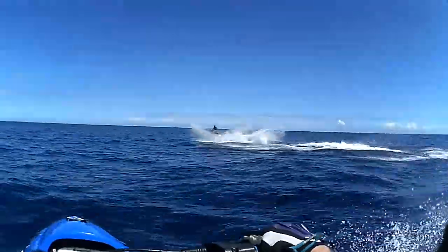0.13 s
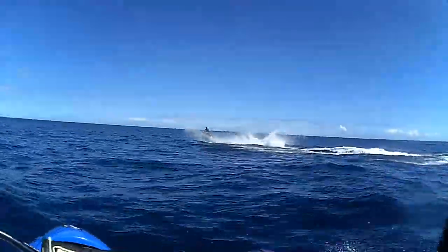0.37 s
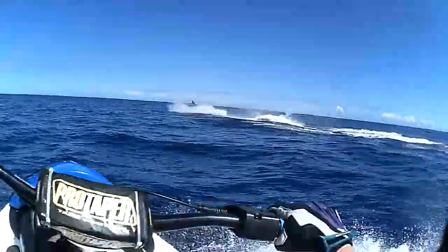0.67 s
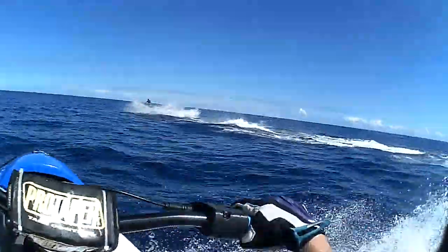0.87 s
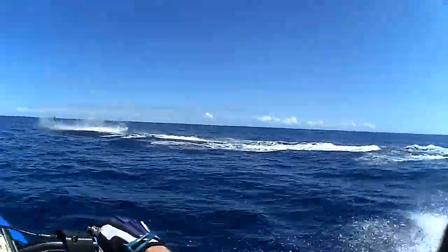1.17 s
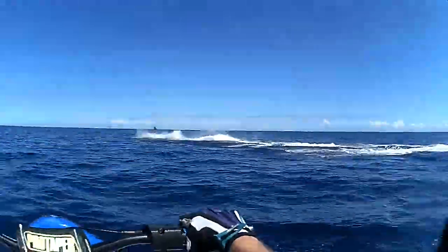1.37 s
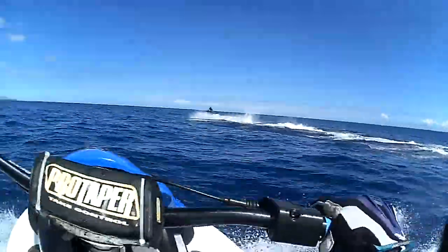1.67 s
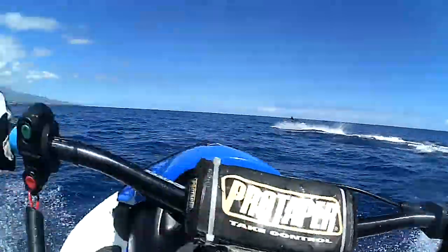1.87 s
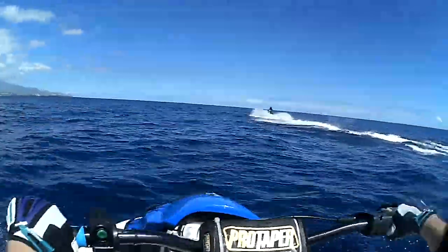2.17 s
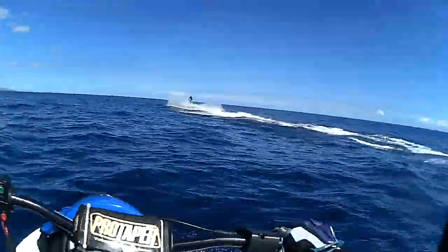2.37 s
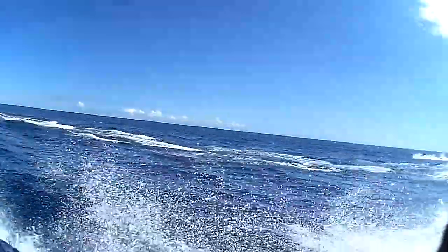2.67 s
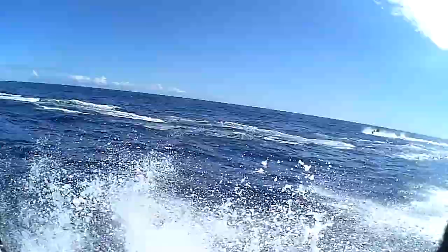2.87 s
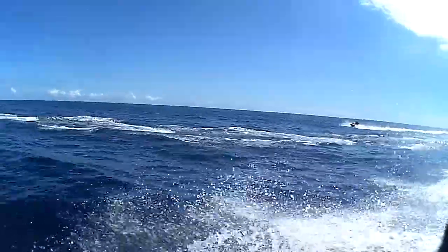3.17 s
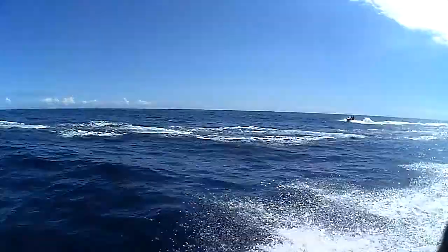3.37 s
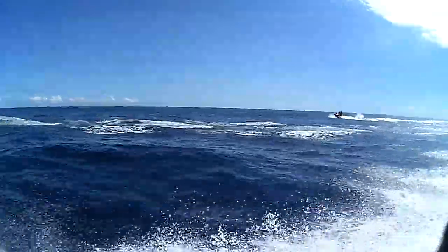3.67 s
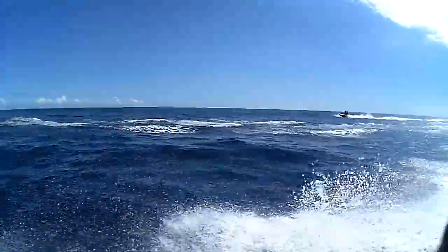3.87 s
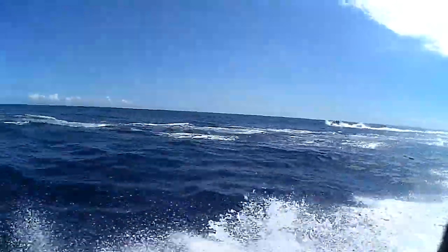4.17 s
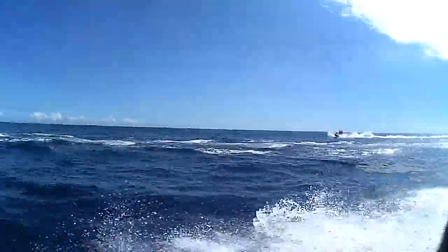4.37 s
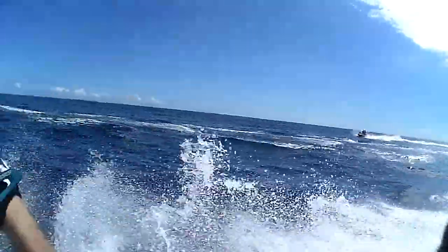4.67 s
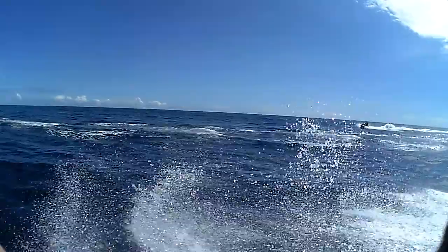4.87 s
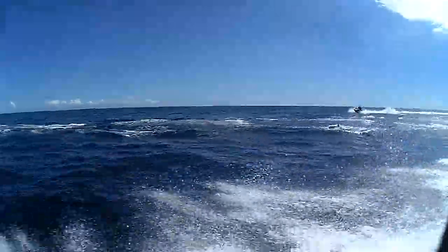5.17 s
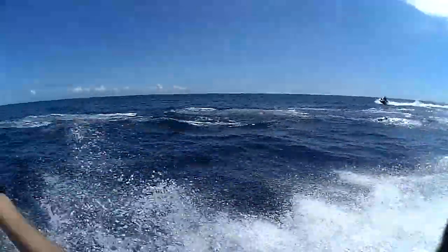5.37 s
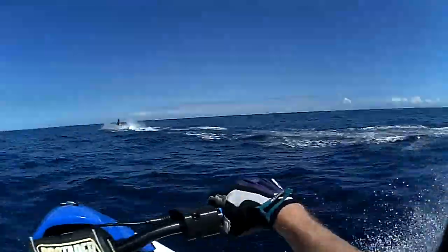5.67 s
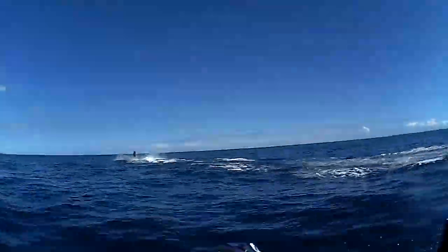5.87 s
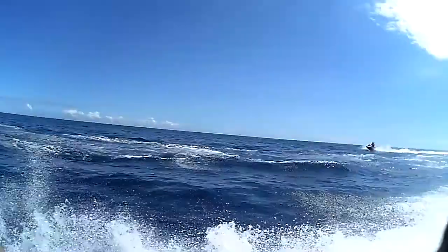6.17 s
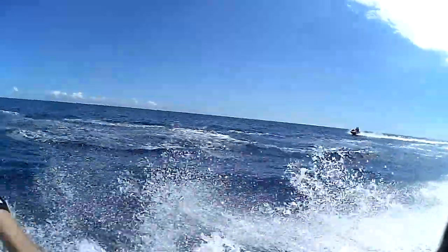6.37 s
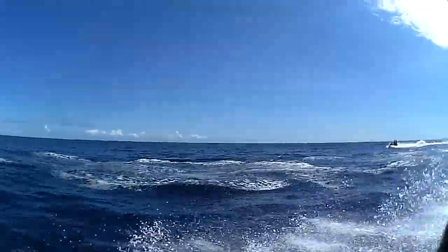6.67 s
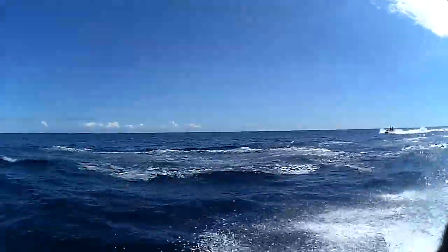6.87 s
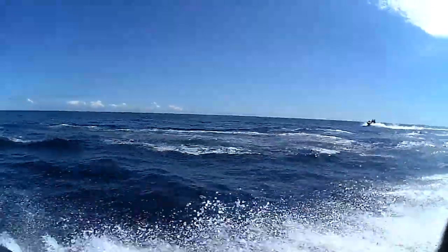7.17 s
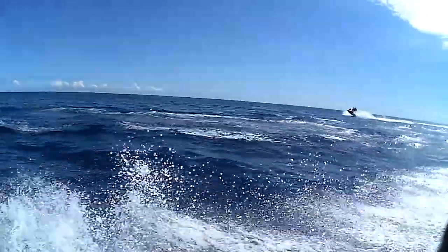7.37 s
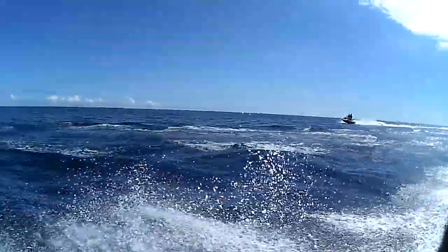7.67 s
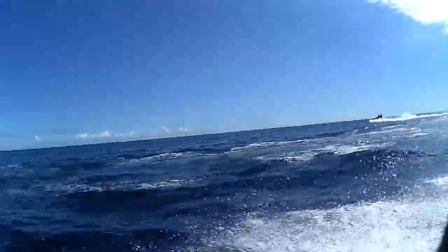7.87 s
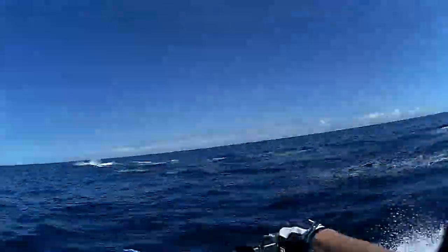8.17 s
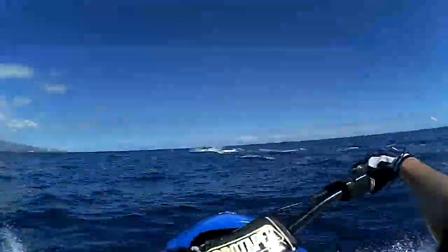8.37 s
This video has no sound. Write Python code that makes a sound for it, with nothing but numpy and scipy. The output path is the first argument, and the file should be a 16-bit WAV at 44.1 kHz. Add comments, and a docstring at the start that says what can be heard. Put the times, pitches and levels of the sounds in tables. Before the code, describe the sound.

A close, muffled onboard microphone picks up a personal watercraft crossing choppy sea. Its rounded, wavering drone dominates, with low buffeting and deep knocks early on. The middle is calmer and higher pitched, broken by a quick drop and recovery of engine speed. Wind and jolts then come back, followed by a last pitch rise and gusts, over thin spray fizz and steady electronic hiss.

```python
"""A personal watercraft runs over choppy water for 8.5 s, heard through a sealed camera case on the rider's head.
First come wave thumps and windy spells, over a firing tone near 140 Hz that rises to about 165 Hz in calmer air.
Near 4 s the throttle is let go: the tone sags to about 90 Hz and climbs back. Near 5.6 s thumps and wind return.
From 7.3 s the tone rises again, with late gusts and thumps. Faint spray, hiss and a trace of whine run throughout.
The tone is a sum of sines, wind and spray are shaped noise, and each thump is one pressure swing plus a rattle."""
import sys
import numpy as np
from scipy import signal
from scipy.fft import rfft, irfft
from scipy.io import wavfile
from scipy.ndimage import uniform_filter1d

SR = 44100
rng = np.random.default_rng(int(sys.argv[2]) if len(sys.argv) > 2 else 0)


def dump(signal):
    """Clip the signal to [-1, 1] and save it as 16-bit WAV at the path in sys.argv[1]."""
    limited = np.clip(np.atleast_2d(signal).T, -1, 1)
    pcm = np.round(limited * 32767).astype(np.int16)
    wavfile.write(sys.argv[1], SR, pcm)


N = 375983  # length in samples

# Levels in the tables are relative: the sources below add trims and small wavers.
# Exhaust partials: multiple of the firing rate, level_db, speed_gain_db (dB per octave of engine speed)
EXHAUST_PARTIALS = [(.5, -23.5, 33), (1, 0.5, 0.5), (1.5, -34, 9), (2, -24, -4.5), (2.5, -38.5, 8),
                    (3, -41, 5), (4, -44, -1)]
# Engine speed, set by the throttle: time_s, firing_rate_hz
ENGINE_SPEED = [(0, 130.9), (.2, 132.3), (.45, 138.5), (1.0, 143.3), (1.55, 138.7), (2.37, 138),
                (2.6, 162.7), (2.8, 168), (3.68, 163.3), (3.83, 148), (4.0, 113), (4.17, 90.5),
                (4.53, 147.4), (4.67, 156.2), (4.85, 159), (5.0, 153.4), (5.45, 152.5), (5.78, 135.4),
                (7.15, 133.3), (7.6, 158), (8.53, 158.5)]
# Loudness of the exhaust note: time_s, level_db
EXHAUST_LEVEL = [(0, -39.5), (.5, -40), (1.0, -37.5), (1.4, -39), (2.0, -37.5), (2.43, -39), (2.78, -46),
                 (3.68, -46), (3.83, -41), (4.0, -43.5), (4.33, -43), (4.66, -38), (5.42, -44),
                 (5.68, -37.5), (5.92, -41), (7.3, -38.5), (7.65, -44.5), (8.1, -40), (8.53, -39.5)]
# Brief dips of the exhaust note: centre_s, half_length_s, depth_db
EXHAUST_DIPS = [(0.236, .06, 3.5), (1.28, 0.087, 2.5), (2.22, 0.097, 9), (5.08, 0.055, 6),
                (6.752, 0.16, 2.5), (7.873, 0.06, 5.5), (8.3, 0.091, 3)]
# Edge of the note, a lift of the partials above the firing tone: time_s, lift_db
EXHAUST_EDGE = [(0, -2), (3.0, -2.5), (5.2, -1.5), (6.5, 3.5), (7.0, -1.5), (7.3, -8), (7.7, 1.5),
                (8.53, 5)]
# Spells with the head facing into the wind: start_s, end_s, rumble_db
HEADWIND_SPELLS = [(.1, 0.454, -55), (.62, 1.04, -47.5), (1.292, 1.55, -50), (1.617, 2.45, -44),
                   (5.59, 5.995, -46.5), (8.21, 8.7, -45)]
# Gusts on the case: centre_s, half_length_s, flutter_db (low buffeting), rush_db (on the shell)
WIND_GUSTS = [(.12, 0.3, -70, -68), (.71, 0.084, -60.5, -71), (.89, 0.052, -62, -58.5),
              (1.39, 0.074, -67, -64.5), (1.56, .08, -60.5, -61.5), (1.7, 0.051, -60.5, -68),
              (2.23, 0.063, -58, -76), (2.38, 0.061, -64, -72), (2.48, 0.028, -66, -62),
              (5.55, 0.037, -66, -64.5), (5.73, .09, -58.5, -61), (5.82, 0.048, -61, -58),
              (8.21, 0.042, -58.5, -60), (8.29, 0.021, -57.5, -68), (8.48, .06, -67, -73)]
# Wind spectra, from the slowest push to the flutter: pitch_hz, level_db (per Hz)
SWAY_SPECTRUM = [(5, 1), (12, 5.5), (24, -2), (45, -12.5), (70, -14), (130, -30), (300, -73)]
RUMBLE_SPECTRUM = [(15, -4.5), (40, 4.5), (85, -2), (125, -3.5), (200, -14.5), (280, -21), (400, -28),
                   (700, -52)]
BUFFET_SPECTRUM = [(30, -16), (90, 3), (220, 0), (280, -3), (360, -9), (500, -14), (700, -21.5),
                   (1000, -32), (2500, -59)]
# Resonances of the case shell: pitch_hz, width_hz (of one filter pass), level_db (drive)
SHELL_RESONANCES = [(1507, 450, 3.5), (1778, 390, 6.5)]
# Jolts from the waves: centre_s, peak_db, push_s (centre to peak), rattle_db
WAVE_THUMPS = [(.135, -31.5, 0.011, -56), (.230, -38, 0.01, -71), (.333, -29, 0.0094, -46),
               (1.011, -39, 0.0049, -50), (1.419, -30.5, 0.004, -43), (1.574, -47, 0.0038, -47),
               (1.956, -36, 0.0068, -70), (1.995, -36.5, 0.006, -58), (2.074, -38, 0.0031, -61),
               (2.318, -34, 0.0052, -72), (5.078, -43, 0.018, -76), (5.640, -41, 0.0034, -48),
               (5.917, -35, 0.0095, -51), (6.640, -37, 0.0095, -57), (6.718, -36.5, 0.0046, -74),
               (6.842, -36, 0.012, -68), (7.903, -41, 0.013, -67), (8.272, -39, .01, -58),
               (8.325, -38, 0.0055, -61)]
# Sheets of spray thrown by the hull: centre_s, half_length_s, level_db
SPRAY_SPLASHES = [(.35, 0.21, -72), (1.38, 0.24, -72.5), (2.9, 0.53, -74), (4.05, .38, -72),
                  (5.02, .1, -70), (6.02, .14, -71.5), (6.7, 0.14, -71), (7.13, 0.077, -70.5),
                  (7.55, 0.19, -71.5), (8.3, .3, -75.5)]
# Spectra of the spray and of the electronic hiss: pitch_hz, level_db (per Hz)
SPRAY_SPECTRUM = [(1500, -11.5), (3000, -14), (5000, -10.5), (6800, -3.5), (7600, -5.5), (8400, -3),
                  (9400, -6.5), (10500, -5), (12000, -12.5), (16000, -9)]
HISS_SPECTRUM = [(30, -7), (200, -3), (500, 9.5), (900, 7), (1700, 4.5), (2300, 3), (3300, 2), (4500, -0.1),
                 (7000, -1), (10000, -2.5), (14500, -1.5), (15700, -15)]

# Wind left when the head is turned aside, and wake fizz between splashes (dB, before trims)
LEE_RUMBLE_DB, LEE_BUFFET_DB, LEE_RUSH_DB = -59, -71, -71
WAKE_DB = -76.5
TIME_S = np.arange(N) / SR


def undb(db):
    """Turn decibels into a gain."""
    return 10 ** (np.asarray(db) / 20)


def unit(x):
    """Scale a signal to an rms of 1."""
    return x / np.sqrt(np.mean(x ** 2))


def curve(table):
    """Join the points of a time table with straight lines, sample by sample."""
    times, values = np.transpose(table)
    return np.interp(TIME_S, times, values)


def walk(rate_hz):
    """Wander smoothly at random: hold random steps, then smooth them twice; rms 1."""
    hold = max(int(SR / rate_hz), 2)
    steps = np.repeat(rng.standard_normal(N // hold + 1), hold)
    smooth = uniform_filter1d(uniform_filter1d(steps, hold), hold)
    return unit(smooth[:N])


def colour(x, spectrum):
    """Filter a signal by a curve of pitch and level, then scale it to rms 1."""
    hz, db = np.transpose(spectrum)
    bin_hz = np.maximum(np.fft.rfftfreq(N, 1 / SR), 1)
    gain = undb(np.interp(np.log(bin_hz), np.log(hz), db))
    return unit(irfft(rfft(x) * gain, N))


def noise(spectrum):
    """Make random noise with the given spectrum; rms 1."""
    return colour(rng.standard_normal(N), spectrum)


def swells(table, bed_db, axis=2):
    """Make a gain of bell-shaped swells over a steady bed; their powers add."""
    power = undb(bed_db) ** 2
    for row in table:
        bell = np.exp(-((TIME_S - row[0]) / row[1]) ** 2)
        power = power + undb(row[axis]) ** 2 * bell
    return np.sqrt(power)


def engine(jitter=0.0022, hunting=0.0029, flutter_db=0.87, bob_db=0.36,
           partial_flutter_db=1.95, trim_db=-2.0, partial_follow=0.52, reference_hz=145):
    """A nearly pure firing tone wavers with the chop; unequal cylinders add half multiples of its rate."""
    firing_hz = uniform_filter1d(curve(ENGINE_SPEED), SR // 25, mode="nearest")
    # jitter and hunting are fast and slow wavers, as fractions of the firing rate
    firings = np.cumsum(firing_hz * (1 + jitter * walk(40) + hunting * walk(9))) / SR
    octaves = np.log2(firing_hz / reference_hz)
    level_db = curve(EXHAUST_LEVEL) - dips_db() + bob_db * walk(10)
    # the weak partials swell less than the firing tone
    steadier_db = level_db.mean() + partial_follow * (level_db - level_db.mean())
    exhaust = 0
    for multiple, db, speed_gain_db in EXHAUST_PARTIALS:
        if multiple == 1:
            swell_db = level_db + flutter_db * walk(28)
        else:
            swell_db = steadier_db + partial_flutter_db * walk(28)
        edge_db = curve(EXHAUST_EDGE) if multiple > 1 else 0
        gain = undb(db + speed_gain_db * octaves + swell_db + edge_db)
        phase = 2 * np.pi * (multiple * firings + rng.random())
        exhaust = exhaust + gain * np.sin(phase)
    return np.sqrt(2) * exhaust * undb(trim_db)


def dips_db():
    """Add up the brief bell-shaped losses of the exhaust note."""
    return sum(depth_db * np.exp(-((TIME_S - centre_s) / half_s) ** 2)
               for centre_s, half_s, depth_db in EXHAUST_DIPS)


def wind(sway_db=-51, sway_follow=0.27, rumble_trim_db=-1.5, buffet_trim_db=9.5,
         rush_trim_db=-3.5, eddy_db=1.2, rush_eddy_db=0.9, lull_db=2.0):
    """Large eddies push on the case as sway and rumble; small ones make flutter and a ringing rush."""
    eddies = walk(45)
    facing_db = headwind_db()
    # the sway follows the headwind only a little
    sway_gain = undb(sway_db + sway_follow * (facing_db - facing_db.mean()))
    sway = noise(SWAY_SPECTRUM) * sway_gain
    rumble_gain = undb(facing_db + rumble_trim_db + eddy_db * eddies + lull_db * walk(7))
    rumble = noise(RUMBLE_SPECTRUM) * rumble_gain
    buffet_gain = swells(WIND_GUSTS, LEE_BUFFET_DB) * undb(buffet_trim_db + eddy_db * eddies)
    buffet = noise(BUFFET_SPECTRUM) * buffet_gain
    rush_gain = swells(WIND_GUSTS, LEE_RUSH_DB, axis=3) * undb(rush_trim_db + rush_eddy_db * eddies)
    rush = shell_noise() * rush_gain
    return sway + rumble + buffet + rush


def headwind_db(turn_s=.045):
    """The rumble rises as the head turns into the wind, holds, and falls as it turns away."""
    power = undb(LEE_RUMBLE_DB) ** 2
    for start_s, end_s, db in HEADWIND_SPELLS:
        turned_in = np.tanh((TIME_S - start_s) / turn_s)
        turned_away = np.tanh((TIME_S - end_s) / turn_s)
        power = power + undb(db) ** 2 * (turned_in - turned_away) / 2
    return 10 * np.log10(power)


def shell_noise():
    """Turbulence rings the case shell: noise passes twice through each resonance; rms 1."""
    ringing = 0
    for hz, width_hz, db in SHELL_RESONANCES:
        b, a = signal.iirpeak(hz, hz / width_hz, fs=SR)
        once = signal.lfilter(b, a, rng.standard_normal(N))
        ringing = ringing + undb(db) * signal.lfilter(b, a, once)
    return unit(ringing)


def thumps(rattle_s=0.0061, lead_s=0.003, flutter_db=-5, shell_db=-14):
    """Each wave jolt swings the pressure down and up once and briefly shakes the case."""
    rattle = noise(RUMBLE_SPECTRUM)
    rattle = rattle + undb(flutter_db) * noise(BUFFET_SPECTRUM)
    rattle = rattle + undb(shell_db) * shell_noise()
    out = 0
    for centre_s, peak_db, push_s, rattle_db in WAVE_THUMPS:
        u = (TIME_S - centre_s) / push_s
        swing = u * np.exp((1 - u ** 2) / 2)  # peaks of -1 and +1 at u = -1 and +1
        # the rattle is strongest just before the middle of the swing
        shake = np.exp(-((TIME_S - centre_s + lead_s) / rattle_s) ** 2 / 2)
        out = out + undb(peak_db) * swing + undb(rattle_db) * rattle * shake
    return out


def spray(drop_spread_db=4.0, surge_db=1.0, trim_db=2.5):
    """Countless droplets of uneven size fizz thinly through the case: noise with random sample levels."""
    drops = rng.standard_normal(N) * undb(drop_spread_db * rng.standard_normal(N))
    gain = swells(SPRAY_SPLASHES, WAKE_DB) * undb(trim_db + surge_db * walk(12))
    return colour(drops, SPRAY_SPECTRUM) * gain


def scene():
    """Add engine, wind, waves and spray at the one microphone."""
    return (engine() + wind() + thumps() + spray())[None]


def record(dry, hiss_db=-64, whine_hz=12441, whine_db=-95, top_hz=15750):
    """The camera's electronics add a steady hiss and a trace of whine; the top is cut steeply."""
    whine = np.sqrt(2) * np.sin(2 * np.pi * whine_hz * TIME_S)
    heard = dry + undb(hiss_db) * noise(HISS_SPECTRUM) + undb(whine_db) * whine
    steep_cut = signal.ellip(12, .1, 80, top_hz, fs=SR, output="sos")
    return signal.sosfilt(steep_cut, heard)


dry = scene()
out = record(dry)
dump(out)
```